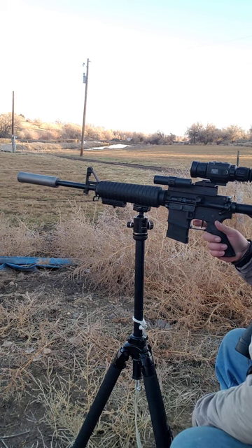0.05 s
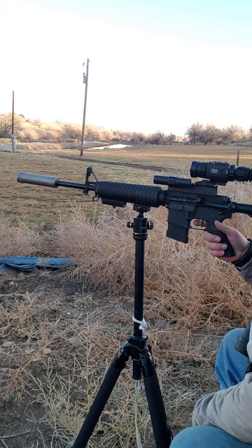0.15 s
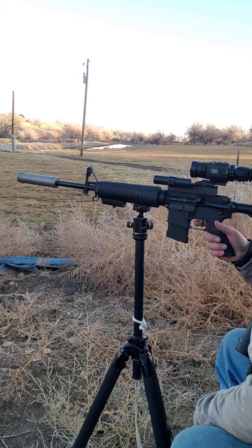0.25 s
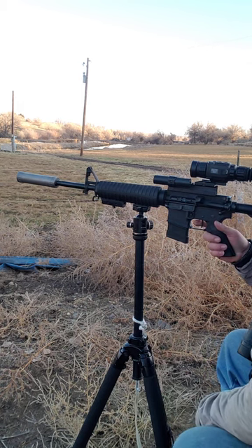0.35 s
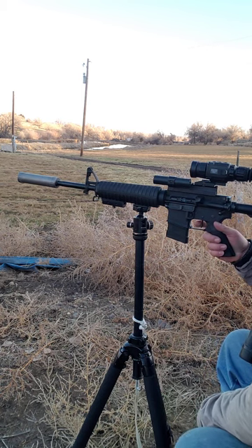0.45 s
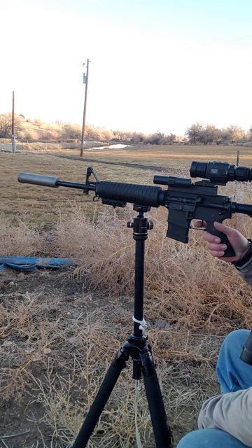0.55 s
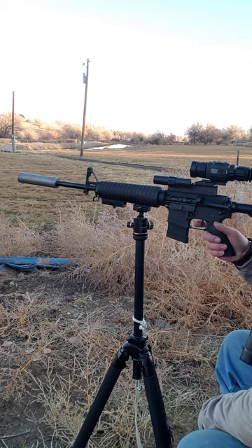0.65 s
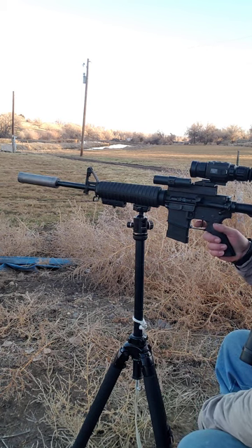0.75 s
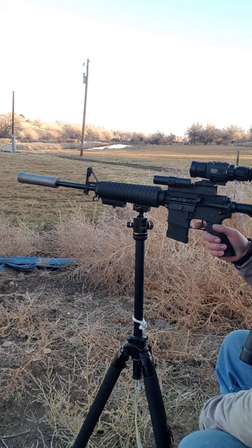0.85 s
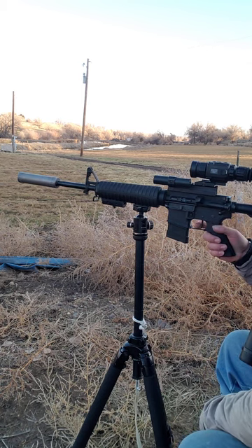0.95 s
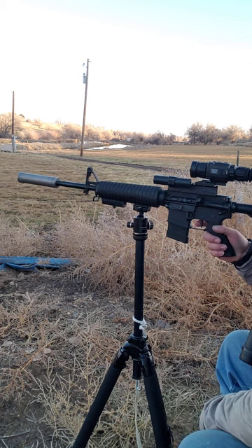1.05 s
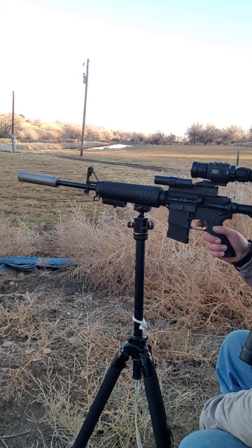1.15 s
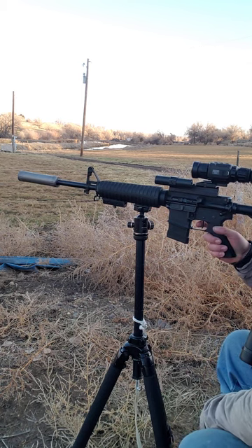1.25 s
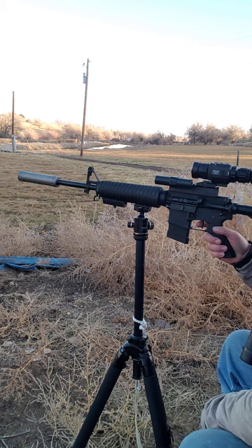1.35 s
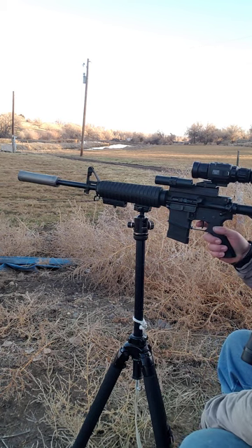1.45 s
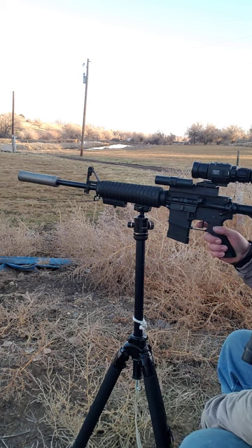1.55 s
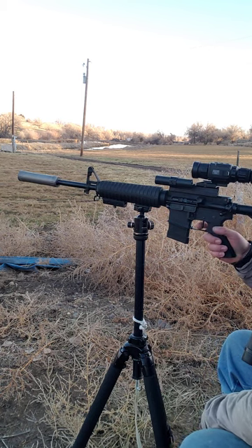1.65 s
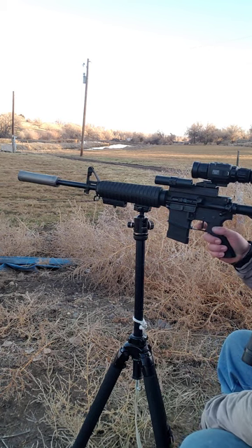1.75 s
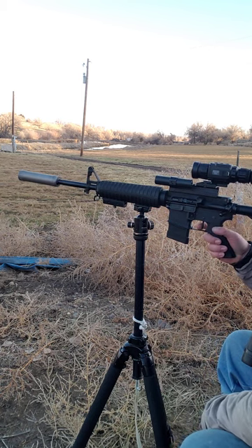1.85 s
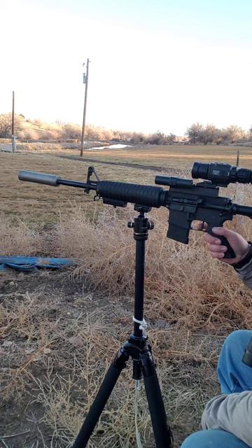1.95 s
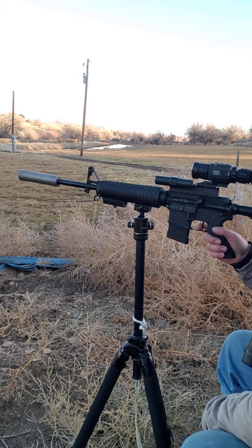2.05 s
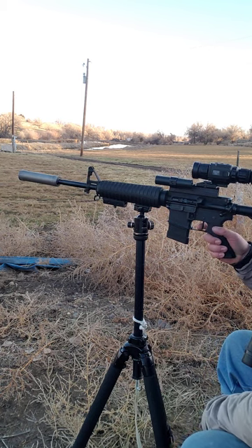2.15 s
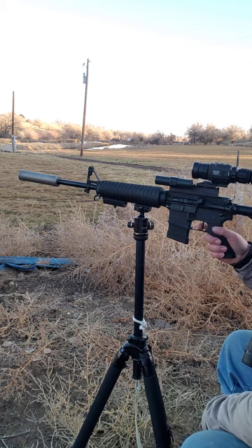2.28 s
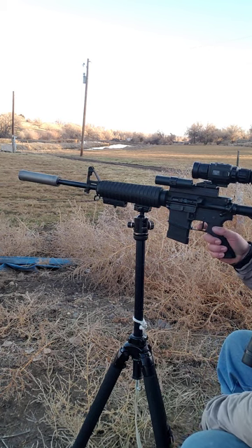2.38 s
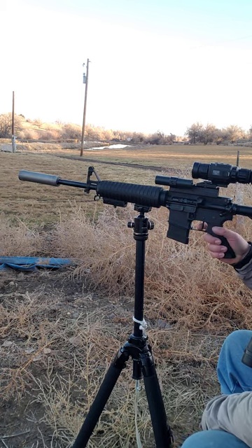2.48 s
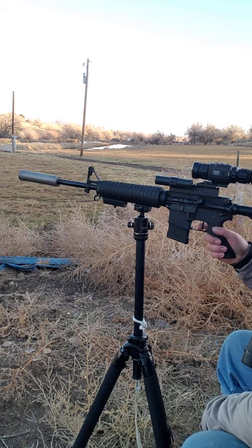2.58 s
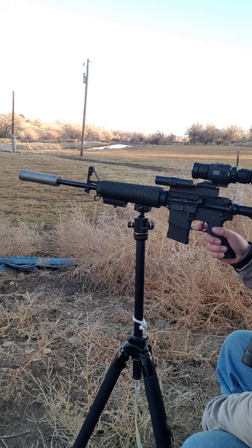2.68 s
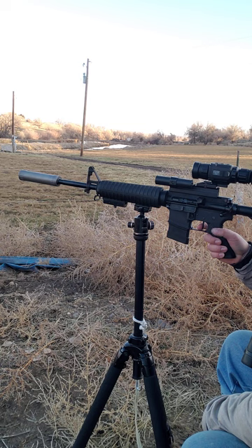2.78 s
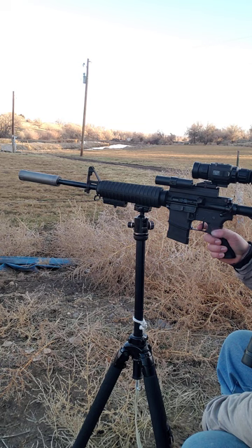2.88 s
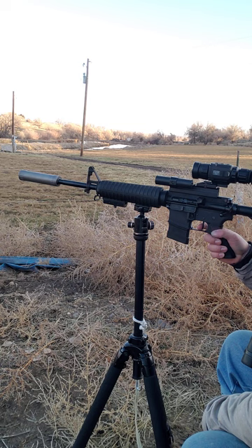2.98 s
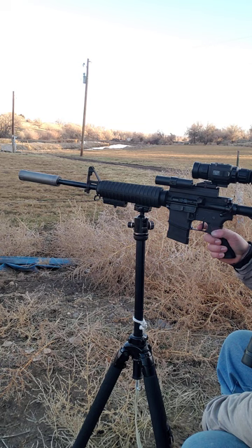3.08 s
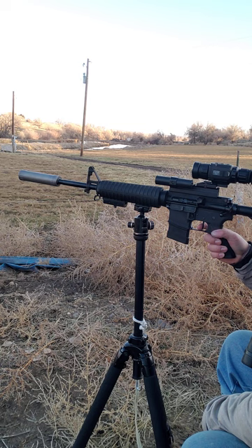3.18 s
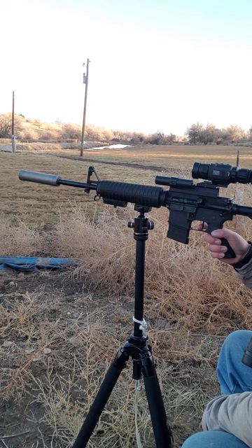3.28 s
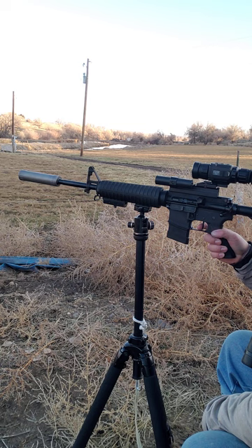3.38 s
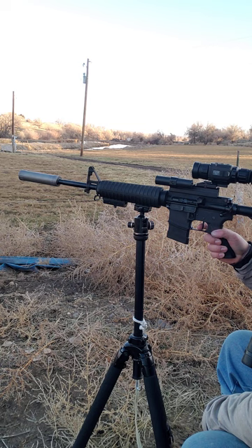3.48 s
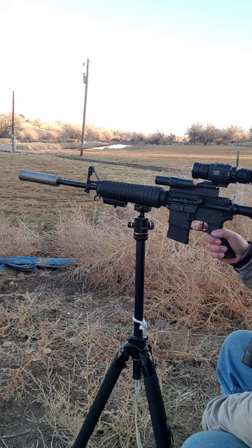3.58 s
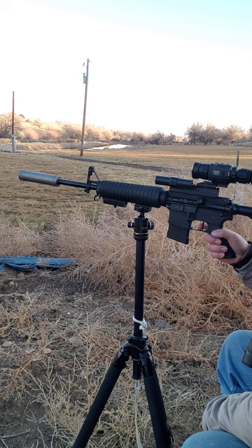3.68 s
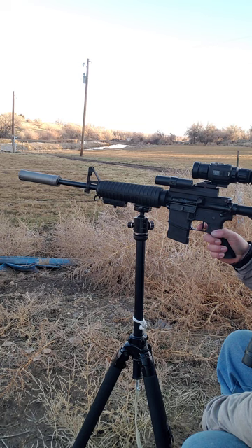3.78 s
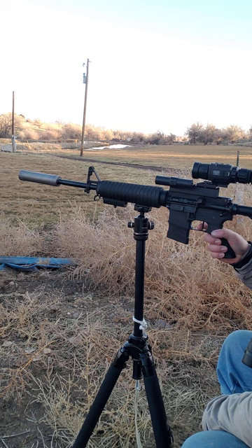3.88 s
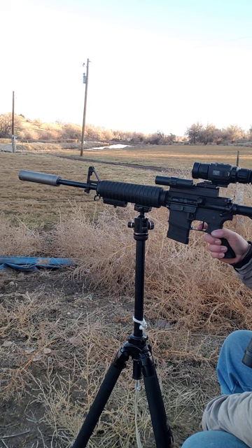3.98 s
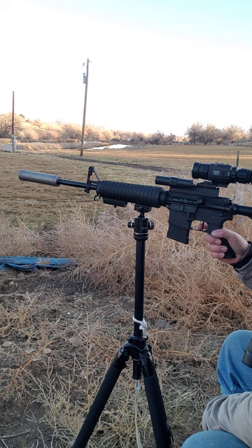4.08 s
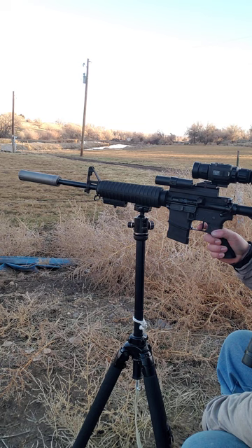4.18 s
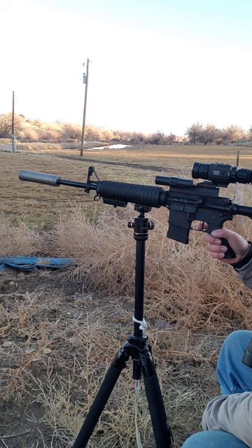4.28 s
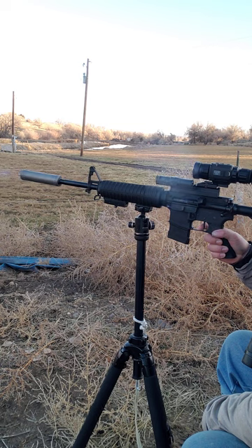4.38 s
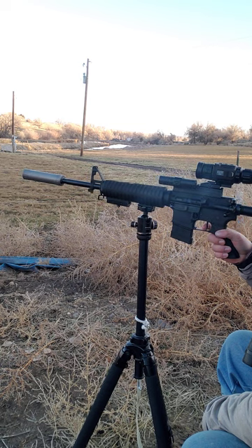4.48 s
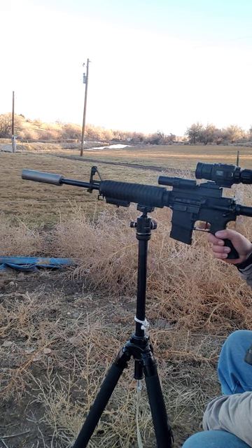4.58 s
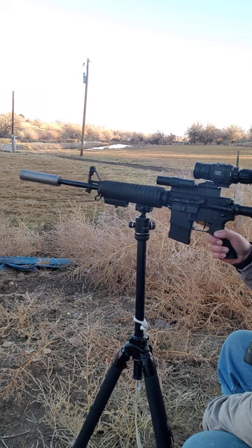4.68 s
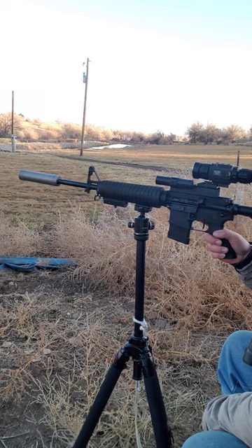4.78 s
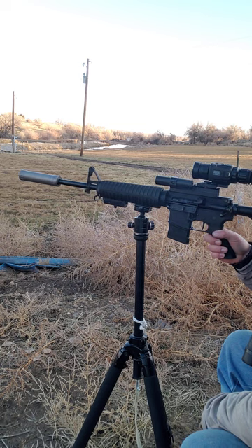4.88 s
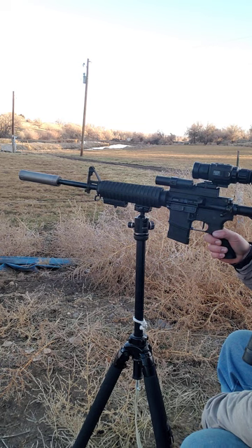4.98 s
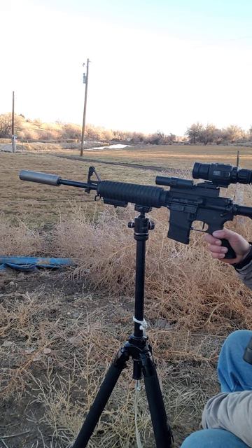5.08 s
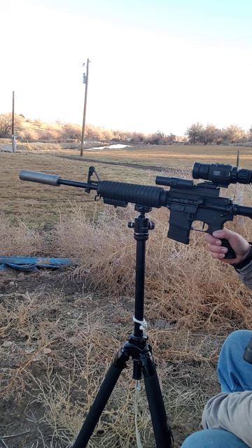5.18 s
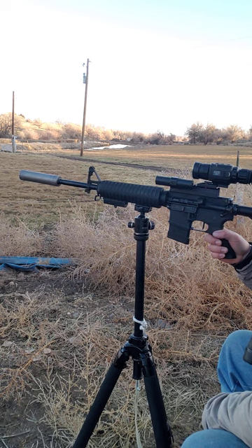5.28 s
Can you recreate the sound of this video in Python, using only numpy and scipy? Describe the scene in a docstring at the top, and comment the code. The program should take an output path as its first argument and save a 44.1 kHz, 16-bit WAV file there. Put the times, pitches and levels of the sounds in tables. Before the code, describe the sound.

A quiet low hum of an idling engine holds for over four seconds with airy hiss, small wind puffs, slight handling ticks and a distant whistling bird. Suddenly a suppressed rifle fires close by, dry and punchy, with the action clattering. The recorder's gain drops at once, burying the background, while quick echoes and a hissy outdoor tail fade and a brass case lands.

```python
"""An engine idles in an open field over light wind, far rumble and a distant bird; a hand rustles and ticks.
Then a suppressed rifle fires once beside a small stereo recorder: hammer, gas blast and bolt are bursts
of noise and pressure steps, and trees and banks return echoes and scatter. The empty case rings as it lands.
The engine is a sum of sines, the air and wind are shaped noise, the bird is gliding tones. The gain control
drops at the first loud sound. Source levels are in dB before the recorder's filters and gain control."""
import sys
import numpy as np
from scipy import signal
from scipy.io import wavfile
from scipy.ndimage import uniform_filter1d

SR = 44100
rng = np.random.default_rng(int(sys.argv[2]) if len(sys.argv) > 2 else 0)


def unload_wav(signal):
    """Save mono or channel-first audio to the path in sys.argv[1] as 16-bit WAV at rate SR, clipped to [-1, 1]."""
    wavfile.write(
        sys.argv[1],
        SR,
        np.round(np.clip(np.atleast_2d(signal).T, -1, 1) * 32767).astype(np.int16),
    )


N = 235475  # samples
T = np.arange(N) / SR  # time [s]
PORT_LAG_S = 9e-5  # time offset between the two ports [s]
SHOT_S = 4.455  # origin of echo delays and scatter


def gain_of(db):
    """Level: amplitude ratio is ten to the power of dB over twenty."""
    return 10 ** (np.asarray(db) / 20)


def evened(x):
    """Normalization: scales a signal to an rms of 1."""
    return x / np.sqrt(np.mean(x ** 2) + 1e-20)


def read(points, hz):
    """Spectral interpolation: reads a table on a log-frequency axis."""
    f, value = np.transpose(points)
    return np.interp(np.log(hz + 1), np.log(f + 1), value)


def curve(rows, t):
    """Temporal interpolation: all columns of a table at the times t."""
    s, *columns = np.transpose(rows)
    return [np.interp(t, s, column) for column in columns]


def wander(hz):
    """Random modulation: low-passed noise of rms 1, slower for a lower corner hz."""
    smooth = uniform_filter1d(rng.standard_normal(N), 200)
    return evened(signal.lfilter([1], [1, -np.exp(-2 * np.pi * hz / SR)], smooth))


def time_frequency_patches(shape, hz_bins, frames):
    """Local averaging: random patches of rms 1 across frequency and time."""
    across_hz = uniform_filter1d(rng.standard_normal(shape), hz_bins, 0)
    return evened(uniform_filter1d(across_hz, frames, 1))


def noise(shape, length, size):
    """Spectral synthesis of stereo noise; shape(hz, t) gives level [dB], likeness and left minus right [dB]."""
    hop = size // 4
    hz = np.fft.rfftfreq(size, 1 / SR)[:, None]
    t = np.arange(length // hop + 5) * hop / SR
    db, same, pan_db = shape(hz, t)
    a, b, c, d = rng.standard_normal((len(t), len(hz), 4)).T
    same = np.clip(same, -1, 1)
    left = a + 1j * b
    # a shared part and an independent part set the coherence between the ports
    right = same * left + np.sqrt(1 - same ** 2) * (c + 1j * d)
    right = right * np.exp(-2j * np.pi * hz * PORT_LAG_S)
    z = np.array([left * gain_of(db + pan_db / 2), right * gain_of(db - pan_db / 2)])
    return signal.istft(z, nperseg=size, noverlap=size - hop)[1][:, :length]


def add(mix, s, sound):
    """Superposition: adds a sound at second s."""
    part = mix[:, round(s * SR):][:, :sound.shape[-1]]
    part += sound[..., :part.shape[1]]


# relative spectrum of far rumble and hiss: (frequency [Hz], density [dB per Hz])
AIR_SPECTRUM = [(120, -22.5), (200, -4.5), (334, -15.5), (508, -23.5), (719, -17.5), (1240, -13),
                (1550, -17.5), (1790, -34), (2320, -21.5), (2830, -39.5), (3600, -40), (5890, -50.5),
                (7330, -35.5), (8640, -58), (12000, -44), (15700, -43.5), (16000, -89)]
# far traffic drifting: (time [s], relative level [dB], extra near 750 Hz [dB])
TRAFFIC_SWELL = [(0, -1.5, 6), (1.0, -2, 3.5), (2.3, 0.5, -2.5), (3.25, 1.5, 1.5), (4.4, 0, -3.5)]
# coherence of the ports: (frequency [Hz], likeness [-1 to 1])
AIR_LIKENESS = [(60, 0.92), (130, 1.0), (290, 0.9), (640, 0.92), (1410, 1), (3100, 0.26), (6820, -0.05),
                (15000, -0.04)]
# stereo balance of the air: (frequency [Hz], left minus right [dB])
AIR_BALANCE = [(60, 1), (110, 2.5), (200, -0.5), (380, 1), (700, 2), (1290, 0), (2380, -6.5), (4400, 4),
               (8120, 11.5), (15000, -3)]


def air():
    """Diffuse field: far rumble and hiss in drifting patches; the treble follows the swell less."""
    def shape(hz, t):
        patches = time_frequency_patches((len(hz), len(t)), 12, 14)
        swell, drone_db = curve(TRAFFIC_SWELL, t)
        drone = drone_db * np.exp(-(np.log2((hz + 1) / 750) / 0.32) ** 2)
        follow = np.where(hz < 3000, 1, .3)
        level = read(AIR_SPECTRUM, hz) + 1.7 * patches + follow * swell + drone
        return level, read(AIR_LIKENESS, hz), read(AIR_BALANCE, hz)
    return gain_of(-59.5) * evened(noise(shape, N, size=1024))


# relative spectrum of the buffeting: (frequency [Hz], density [dB per Hz])
WIND_SPECTRUM = [(15, -6.5), (50, 5), (85, -2.5), (140, -17.5), (300, -37.5)]
# puffs of wind: (centre time [s], level [dB])
WIND_PUFFS = [(.13, -48), (.285, -46), (.92, -46.5), (1.45, -51.5), (2.7, -58), (3.06, -47.5), (3.22, -53),
              (4.12, -55)]
GUST_S, CALM_DB = .05, -62.5  # half length of a puff; level between puffs


def wind():
    """Turbulent pressure: lumpy low buffeting, mostly different at each port, in short puffs."""
    def shape(hz, t):
        return read(WIND_SPECTRUM, hz) - 200 * (hz > 900), .2, 1.5
    buffet = evened(noise(shape, N, size=2048))
    puffs = sum(gain_of(db) * np.exp(-((T - s) / GUST_S) ** 2) for s, db in WIND_PUFFS)
    return buffet * (gain_of(CALM_DB) + puffs) * gain_of(2.5 * wander(8.8))


# strongest engine order: (time [s], frequency [Hz], reference level of the orders [dB])
IDLE_DRIFT = [(0, 103.1, -42), (.9, 103.1, -43), (1.5, 102.8, -43), (1.9, 102.6, -41.5),
              (3.15, 102.7, -41.5), (3.5, 102.2, -41), (4.4, 102.9, -40.5)]
# engine orders: (multiple of the cycle frequency, level over the reference [dB])
ENGINE_ORDERS = [(4, -8.5), (5, -19), (6, -16.5), (7, -15.5), (8, 0.5), (9, -14.5), (10, -24), (11, -18),
                 (12, -5.5), (13, -13), (14, -18), (15, -31), (16, -26.5)]
# relative spectrum of the exhaust noise: (frequency [Hz], density [dB per Hz])
EXHAUST_SPECTRUM = [(20, -20.5), (45, 0), (80, -0.5), (140, -5), (220, -13.5), (400, -32)]
STRONGEST, RUMBLE_DB = 8, -57  # strongest order's multiple of the cycle; exhaust noise level


def engine():
    """Periodic excitation: cylinders fire unevenly, so every order of the cycle sounds and wavers on its own."""
    order_hz, idle_db = curve(IDLE_DRIFT, T)
    cycles = np.cumsum(order_hz / STRONGEST) / SR
    hum = 0
    for k, db in ENGINE_ORDERS:
        # the pipe smears each of the four firings, which evens the throb; orders between them start anywhere
        start = (k / 8) ** 2 + rng.random() * (k % 4 > 0)
        phase = 2 * np.pi * (k * cycles + start) + 0.078 * wander(13.0)
        hum = hum + gain_of(db + 1.1 * wander(2.3)) * np.sin(phase)
    left, right = np.sqrt(2) * gain_of(idle_db) * hum * gain_of([[.25], [-.25]])
    left = np.roll(left, round(PORT_LAG_S * SR))

    def shape(hz, t):
        return read(EXHAUST_SPECTRUM, hz) - 200 * (hz > 900), .97, .5
    rumble = evened(noise(shape, N, size=2048))
    return np.array([left, right]) + gain_of(RUMBLE_DB) * rumble


def whistle(length, hz, glide, db, pan_db):
    """Frequency modulation: a gliding tone with an unsteady pitch and a broken level."""
    t = np.arange(0, length, 1 / SR)
    pitch = (hz + glide * t) * (1 + .015 * wander(60.0)[:len(t)])
    broken_db = 4 * wander(22.0)[:len(t)]
    tone = np.sin(2 * np.pi * np.cumsum(pitch) / SR) * gain_of(db + broken_db)
    return tone * np.hanning(len(t)) ** .5 * gain_of([[pan_db / 2], [-pan_db / 2]])


# bird whistles: (start time [s], length [s], first frequency [Hz], glide [Hz per s], level [dB])
BIRD_WHISTLES = [(2.082, 0.24, 2416, -1900, -70.5), (2.548, 0.29, 2382, -700, -67),
                 (3.083, .16, 2090, 200, -67.5), (3.263, 0.075, 1570, -100, -63),
                 (3.646, 0.17, 2373, 240, -66), (4.072, .14, 2386, -100, -70.5),
                 (4.16, .11, 2176, 300, -68.5), (4.243, 0.058, 2340, -100, -68.5)]


def bird():
    """Propagation through turbulent air: faint, broken whistles from the right."""
    out = np.zeros((2, N))
    for start, *row in BIRD_WHISTLES:
        add(out, start, whistle(*row, pan_db=-7.5))
    return out


# coloration of loud sounds: (frequency [Hz], response [dB])
MIC_RESPONSE = [(60, 3.5), (700, 4.5), (3000, 5), (6200, 2.5), (7900, -1.5), (8700, -12), (11000, -1),
                (14800, 5), (15800, 2.5), (16500, -13.5)]
# stereo balance of loud sounds: (frequency [Hz], left minus right [dB])
MIC_BALANCE = [(60, 0), (8000, -0.5), (10000, -3), (15000, -3.5)]
# coherence of loud sounds: (frequency [Hz], likeness [-1 to 1])
MIC_LIKENESS = [(60, 1), (300, 1), (1400, 0.49), (3000, 0.52), (16000, 0)]


def burst(db, rise, t60, hz, width, pan_db):
    """Transient band noise: a puff around hz, width in octaves, quick to rise and decaying exponentially."""
    t = T[:SR // 2]

    def shape(f, _):
        band = -6 * (np.log2((f + 30) / hz) / width) ** 2
        return read(MIC_RESPONSE, f) + band, read(MIC_LIKENESS, f), read(MIC_BALANCE, f) + pan_db
    puff = evened(noise(shape, len(t), size=1024))
    # turbulence comes in spurts
    crackle_db = 1.5 * evened(uniform_filter1d(rng.standard_normal(len(t)), 50))
    return puff * gain_of(db + crackle_db - 60 * t / t60) * np.minimum(t / rise, 1)


# small ticks of the rifle: (time [s], level [dB], left minus right [dB])
RIFLE_TICKS = [(.594, -71, 3), (.617, -74, -3), (.657, -74, 5), (.681, -74, -2), (.729, -75, 0),
               (1.84, -70, 1)]
# rustles of the hand: (time [s], level [dB], decay t60 [s], band centre [Hz], left minus right [dB])
HAND_RUSTLES = [(.022, -55.5, 0.086, 9000, -5), (1.487, -74, .14, 5600, -1)]
RUSTLE_TAIL_DB, RUSTLE_TAIL_T60 = -11.5, .4  # level relative to the rustle; decay [s]


def handling():
    """Contact and friction noise: ticks and rustles before the shot, each rustle with a slower tail."""
    out = np.zeros((2, N))
    for s, db, pan_db in RIFLE_TICKS:
        add(out, s, burst(db, rise=.0006, t60=.013, hz=6000, width=.4, pan_db=pan_db))
    for s, db, t60, hz, pan_db in HAND_RUSTLES:
        for part_db, part_t60 in [(db, t60), (db + RUSTLE_TAIL_DB, RUSTLE_TAIL_T60)]:
            add(out, s, burst(part_db, rise=.002, t60=part_t60, hz=hz, width=1, pan_db=pan_db))
    return out


# decay of the brush scatter: (frequency [Hz], t60 [s])
BRUSH_DECAY = [(100, .3), (300, 0.71), (600, 0.71), (1100, 0.35), (2000, 0.59), (4000, .5), (8000, 0.45),
               (11000, 0.38), (15500, 0.31)]
NEAR_DB = -1.5


def near_scatter(length):
    """Multiple scattering: near brush returns the blast at once, each frequency with its own decay."""
    def shape(hz, t):
        level = read(MIC_RESPONSE, hz) - 60 * t / read(BRUSH_DECAY, hz)
        return level, read(MIC_LIKENESS, hz), read(MIC_BALANCE, hz)
    near = noise(shape, length, size=256)
    return gain_of(NEAR_DB) * near / np.sqrt(np.mean(near[:, :512] ** 2))  # level set at the onset


FAR_DB, FAR_FALL_DB_PER_S, FAR_ROUGH_DB = -30.5, 1.5, 2
FAR_FADES_AFTER_S, FAR_FADE_DB_PER_S = .6, 23.5  # the far field ends and the scatter fades faster
FAR_HIGH_HZ, DULLING_OCTAVES_PER_S = 5870, 1.0  # the upper edge sinks with distance
# the lower edge holds, then settles lower
FAR_LOW_HZ, FAR_LOWEST_HZ, WIDENS_AFTER_S, WIDENING_S = 1620, 820, .37, 0.17


def far_scatter(length):
    """Distance filtering: the far field returns a band whose two edges sink with time."""
    def shape(hz, t):
        settling = np.exp(-np.maximum(t - WIDENS_AFTER_S, 0) / WIDENING_S)
        low_hz = FAR_LOWEST_HZ + (FAR_LOW_HZ - FAR_LOWEST_HZ) * settling
        high_hz = FAR_HIGH_HZ / 2 ** (DULLING_OCTAVES_PER_S * t)
        patches = time_frequency_patches((len(hz), len(t)), 10, 6)
        band = -10 * np.log10(1 + (low_hz / (hz + 30)) ** 9) - 10 * np.log10(1 + (hz / high_hz) ** 7)
        # the ports favour this region
        band = band + 4.5 * np.exp(-(np.log2((hz + 1) / 2500) / 0.091) ** 2)
        band = band - 10 * np.log10(np.mean(gain_of(2 * band), 0))  # evens the band over time
        level = band + FAR_ROUGH_DB * patches + np.minimum(read(MIC_RESPONSE, hz), 0)
        return level, 0.74 * (hz < 2000), 2.5
    t = T[:length]
    fade_db = FAR_FALL_DB_PER_S * t + FAR_FADE_DB_PER_S * np.maximum(t - FAR_FADES_AFTER_S, 0)
    level_db = FAR_DB - fade_db + 0.99 * wander(20.0)[:length]
    return evened(noise(shape, length, size=512)) * gain_of(level_db)


# relative spectrum of the rolling low return: (frequency [Hz], density [dB per Hz])
BOOM_SPECTRUM = [(40, -10), (150, -4), (280, 4.5), (450, -4), (620, -25), (900, -48.5)]
BOOM_DB, BOOM_FALL_DB_PER_S = -13.5, 140  # quick part
BOOM_LATE_DB, BOOM_LATE_FALL_DB_PER_S = -33, 18  # slow part


def boom(length):
    """Two-stage decay: a rolling low return falls quickly, then slowly."""
    t = T[:length]
    quick = gain_of(BOOM_DB - BOOM_FALL_DB_PER_S * t)
    slow = gain_of(BOOM_LATE_DB - BOOM_LATE_FALL_DB_PER_S * t)
    roll = evened(noise(lambda hz, t: (read(BOOM_SPECTRUM, hz), .85, .5), length, size=2048))
    return roll * (quick + slow) * gain_of(3.5 * wander(15.0)[:length])


def scatter():
    """Reverberation: near, far and low returns of the shot build up together over 10 ms."""
    length = N - round(SHOT_S * SR)
    returns = near_scatter(length) + far_scatter(length) + boom(length)
    out = np.zeros((2, N))
    add(out, SHOT_S, returns * np.minimum(T[:length] / .01, 1))
    return out


# single echoes off trees and banks:
# (time [s], level [dB], band centre [Hz], width [octaves], left minus right [dB])
TREE_AND_BANK_ECHOES = [(4.549, -7.5, 2480, 0.62, 7), (4.579, -25, 3000, 1.5, 8),
                        (4.6084, -8.5, 2200, 1.13, 2.5), (4.615, -20, 4000, .7, -5),
                        (4.7118, -14, 2000, 1.2, -1), (4.713, -20.5, 228, 0.6, 0),
                        (4.891, -17.5, 2300, .7, 1), (4.935, -29, 330, .55, 0), (4.939, -27, 2510, .8, 2),
                        (4.964, -17, 2910, 0.75, -1)]
BLUR_PER_S = .013  # rise time [s] gained per second of delay


def echoes():
    """Reflection: single returns, each rising the slower the later it comes."""
    out = np.zeros((2, N))
    for s, db, hz, width, pan_db in TREE_AND_BANK_ECHOES:
        add(out, s, burst(db, BLUR_PER_S * (s - SHOT_S), 0.079, hz, width, pan_db))
    return out


# short metallic notes in the tail:
# (start time [s], length [s], first frequency [Hz], glide [Hz per s], level [dB], left minus right [dB])
METALLIC_NOTES = [(4.819, .03, 3090, -1000, -32.5, 7), (4.842, .035, 2620, -1500, -33, 7)]


def metallic_notes():
    """Gliding tones: two short metallic notes fall in pitch within the tail."""
    out = np.zeros((2, N))
    for s, *row in METALLIC_NOTES:
        add(out, s, whistle(*row))
    return out


def ring(hz, db, t60):
    """Damped oscillation: a sine decaying by 60 dB in t60 seconds."""
    t = T[:SR // 2]
    return gain_of(db - 60 * t / t60) * np.sin(2 * np.pi * hz * t)


CASE_S = 5.083  # the case lands
# brass case: (mode frequency [Hz], level [dB], decay t60 [s])
CASE_MODES = [(15045, -49.5, 0.28), (15005, -55, .12), (15710, -57, .12), (11370, -70, .15)]
# the case hits the ground:
# (level [dB], rise [s], decay t60 [s], band centre [Hz], width [octaves], left minus right [dB])
CASE_LANDING = (-42, .001, .025, 9000, 1.6, 0)


def falling_case():
    """Modal vibration: the impact on the ground sets the modes of the empty case ringing."""
    out = np.zeros((2, N))
    add(out, CASE_S, burst(*CASE_LANDING))
    for mode in CASE_MODES:
        add(out, CASE_S, ring(*mode))
    return out


# parts of the shot: hammer, primer, crack, low gas, high gas, bolt back, bolt home, its rebound:
# (time [s], level [dB], decay t60 [s], band centre [Hz], width [octaves])
RIFLE_ACTION = [(4.4452, -4, .014, 6000, 1.6), (4.4508, 0, .02, 2000, 2.2), (4.4528, 19, .022, 4500, 2.0),
                (4.4575, 8, .12, 600, 1.9), (4.456, 10, .15, 13000, 1.4), (4.4705, 7, .11, 6000, .7),
                (4.5027, 12, .028, 6500, .9), (4.508, -2, .06, 9000, 1.2)]


def action():
    """Impact and jet noise: hammer, primer, crack, gas and bolt as bursts of noise."""
    out = np.zeros((2, N))
    for s, db, t60, hz, width in RIFLE_ACTION:
        add(out, s, burst(db, rise=.0018, t60=t60, hz=hz, width=width, pan_db=0))
    return out


def blast(db, length):
    """Blast wave: a sudden overpressure followed by a shallow suction."""
    u = T[:SR // 20] / length
    return gain_of(db) * (1 - u) * np.exp(-u) * np.minimum(u / 0.12, 1)


# pressure steps, two from the muzzle on the left, two from the breech on the right:
# (time at left port [s], strength [dB], length [s], right port later by [s])
PRESSURE_STEPS = [(4.4527, 18, .0006, .0003), (4.4537, 23, .0006, .0003), (4.4575, 17, .0013, -.0012),
                  (4.4597, 21, .0013, -.0012)]
# low pressure push: (time [s], frequency [Hz], level [dB], decay t60 [s], left minus right [dB])
PRESSURE_PUSH = (4.459, 62, 4.7, .11, 8)


def gas_pressure():
    """Pressure release: blast waves reach the ports at different times, with a low damped push."""
    out = np.zeros((2, N))
    for s, db, length, later in PRESSURE_STEPS:
        add(out[:1], s, blast(db, length))
        add(out[1:], s + later, blast(db, length))
    s, hz, db, t60, pan_db = PRESSURE_PUSH
    add(out, s, -ring(hz, db, t60) * gain_of([[pan_db / 2], [-pan_db / 2]]))
    return out


def rifle():
    """Superposition: the shot itself, its returns and the falling case."""
    returns = scatter() + echoes() + metallic_notes()
    return returns + falling_case() + action() + gas_pressure()


def scene():
    """Superposition: the background, the handling and the rifle add linearly."""
    return air() + wind() + engine() + bird() + handling() + rifle()


BASS_HZ, EDGE_HZ = 48.8, 16700  # the microphones lose the deepest bass; upper limit of the band
TRIP_DB, DUCK_DB, AHEAD_S = -25, 29, .002  # power that trips the gain; gain drop; look-ahead


def record(dry):
    """Gain control: looks a little ahead, drops to low gain at the first loud sound and stays there."""
    heard = signal.sosfilt(signal.butter(2, BASS_HZ, "high", fs=SR, output="sos"), dry)
    power_db = 10 * np.log10(abs(uniform_filter1d((heard ** 2).mean(0), 44)) + 1e-12)
    tripped = np.maximum.accumulate(power_db) > TRIP_DB
    ahead = round(AHEAD_S * SR)
    tripped = np.concatenate([tripped[ahead:], np.repeat(tripped[-1], ahead)])
    ducked = heard / gain_of(DUCK_DB * uniform_filter1d(tripped * 1., 130))
    low_pass = signal.firwin(511, EDGE_HZ, window=("kaiser", 9), fs=SR)
    return signal.oaconvolve(ducked, low_pass[None], "same")


dry = scene()
out = record(dry)
unload_wav(out)
```